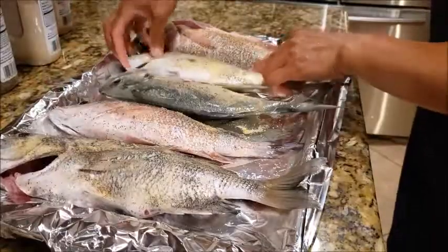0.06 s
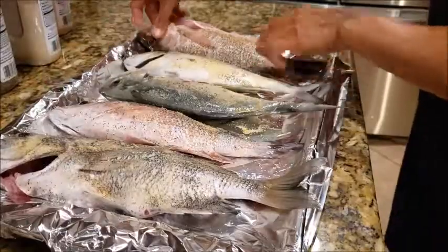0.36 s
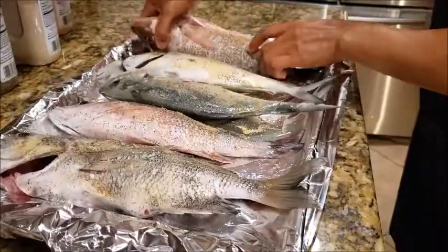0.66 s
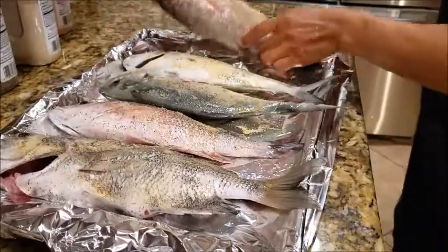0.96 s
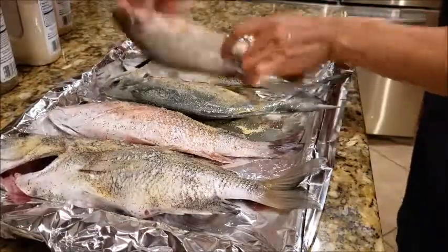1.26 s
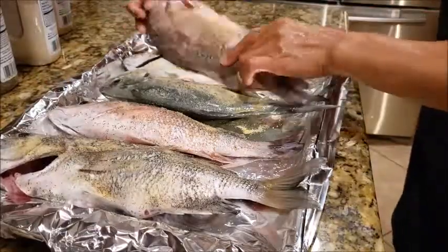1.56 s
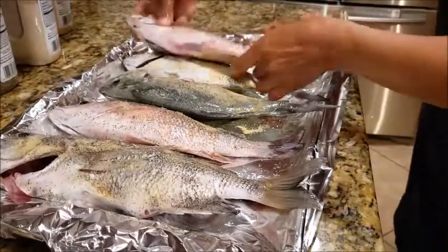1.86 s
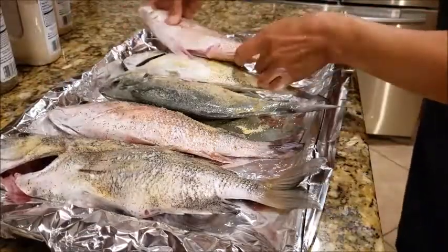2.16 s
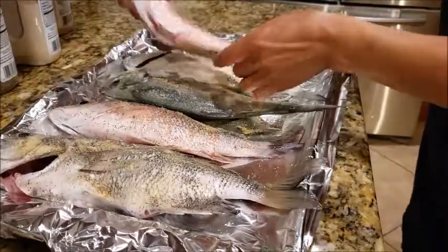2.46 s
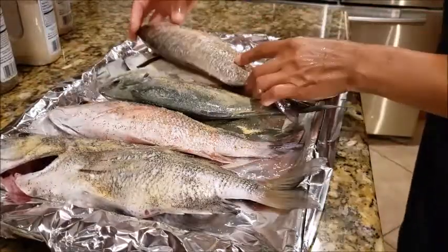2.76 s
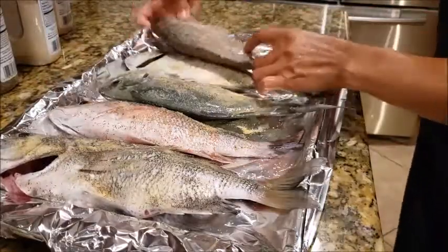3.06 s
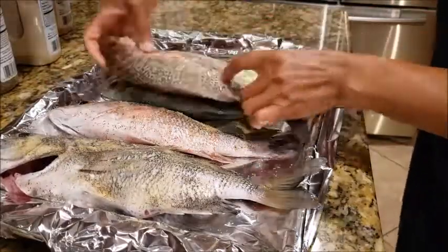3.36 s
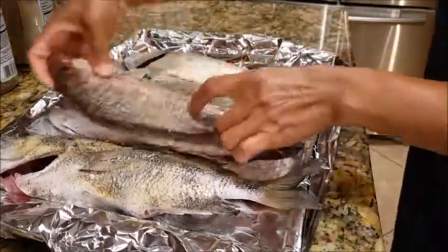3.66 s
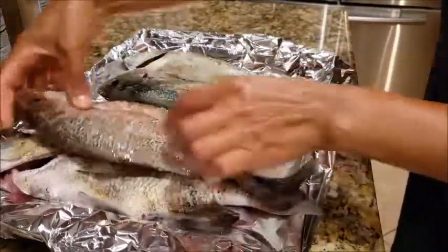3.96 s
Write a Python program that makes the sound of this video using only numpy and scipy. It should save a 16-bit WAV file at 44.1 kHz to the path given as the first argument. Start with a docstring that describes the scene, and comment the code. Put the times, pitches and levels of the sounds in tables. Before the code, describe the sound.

Foil crackles under whole fish being moved, with soft slaps, low thuds and a steady hum.

```python
"""Foil lining a tray snaps and crinkles as whole wet fish are lifted and laid down on it.
Single creases snap over, and crumpling sets off dense runs of tiny cracks. The fish land with soft
slaps that ring the damped metal, and their weight rocks the tray in low thuds. Foil and slaps ring
briefly in a small, hard kitchen, while an appliance's motor and fan hum steadily behind."""
import sys
import numpy as np
from scipy import signal
from scipy.fft import rfft, irfft, next_fast_len
from scipy.io import wavfile
from scipy.ndimage import uniform_filter1d

SR = 44100
rng = np.random.default_rng(int(sys.argv[2]) if len(sys.argv) > 2 else 0)


def generate_wav(sig):
    """Save sig (samples, or channels by samples) to the path in sys.argv[1] as 16-bit PCM at SR."""
    pcm = np.round(np.clip(np.atleast_2d(sig).T, -1, 1) * 32767).astype(np.int16)
    wavfile.write(sys.argv[1], SR, pcm)


N = 176400
T = np.arange(N) / SR
SIDES = np.array([[1], [-1]])  # left, right
MOTOR_HZ = 150


def amp(db):
    """Decibels to gain."""
    return 10 ** (np.asarray(db) / 20)


def rms(x):
    """Average level of a signal."""
    return np.sqrt(np.mean(x ** 2) + 1e-20)


def unit(x):
    """Scale to rms 1."""
    return x / rms(x)


def at_hz(table, hz, column=1):
    """Read a column of a table on a log-frequency axis."""
    table = np.array(table)
    return np.interp(np.log(hz + 1e-3), np.log(table[:, 0]), table[:, column])


def pan(db):
    """Left and right gains for a left-right level difference."""
    return amp(SIDES * db / 2)


def drift(rate_hz):
    """Slow random modulation, rms 1."""
    hz = np.fft.rfftfreq(N, 1 / SR)
    return unit(irfft(rfft(rng.standard_normal(N)) / (1 + (hz / rate_hz) ** 2), N))


def add(out, start_s, x):
    """Mix a sound in at a time."""
    i = max(int(start_s * SR), 0)
    out[..., i:i + x.shape[-1]] += x[..., :N - i]


def even_burst(envelope):
    """Noise under an envelope, its spectrum evened out so that it has no pitch; energy 1."""
    x = rng.standard_normal(envelope.shape) * envelope
    for _ in range(4):  # flatten the spectrum, then restore the envelope
        spectrum = rfft(x)
        x = irfft(spectrum / (np.abs(spectrum) + 1e-12), envelope.shape[-1])
        x = x * envelope / np.sqrt(np.abs(uniform_filter1d(x ** 2, size=64)) + 1e-14)
    return x / np.sqrt(np.sum(x ** 2, axis=-1, keepdims=True))


def place(x, treble_db, shelf_hz=10600, scatter_db=-2.5, scatter_decay_s=0.0049):
    """Give a burst its treble, its spot on the tray and counter scatter: rows left, right, room send."""
    t = T[:SR // 30]
    size = next_fast_len(len(x) + len(t))
    hz = np.fft.rfftfreq(size, 1 / SR)
    shelf = amp(treble_db * hz ** 8 / (hz ** 8 + shelf_hz ** 8))
    spectrum = rfft(np.pad(x, (20, 0)), size) * shelf
    left_lead_s = rng.normal(-0.00012, 0.00012)
    direct = np.exp(1j * np.pi * hz * left_lead_s * SIDES) * pan(db=1)
    scatter = even_burst(np.tile(np.exp(-t / scatter_decay_s), (2, 1)))
    stereo = direct + amp(scatter_db) * rfft(scatter, size)
    return irfft(spectrum * np.vstack([stereo, np.ones(len(hz))]), size)


def foil_crinkles(cracks_per_s=2600, spread_db=3, attack_share=0.1, gain_db=0.5):
    """Foil crumples under a fish or a hand: a quick swell of tiny cracks of uneven size."""
    # crumples of the foil: t/s, length/s, relative level/dB, treble/dB
    crumples = [(0.0, 0.018, -39.5, 0), (0.084, 0.038, -49, -12), (0.15, 0.088, -48.5, 4),
                (0.197, 0.041, -43.5, -3), (0.4, 0.065, -42.5, -1.5), (0.47, 0.078, -49, -2),
                (0.544, 0.042, -42.5, 2.5), (0.597, 0.15, -45, -7), (0.72, 0.03, -39.5, -23),
                (0.749, 0.062, -33.5, -5.5), (1.318, 0.04, -38, -1.5), (1.511, .13, -59, -1),
                (1.884, 0.046, -49, 0), (2.114, 0.063, -44.5, -2), (2.273, 0.032, -48, -16),
                (2.317, 0.29, -64, -12), (2.682, 0.06, -40, -9), (2.692, 0.042, -32, -0.5),
                (2.755, 0.024, -35.5, 3.5), (2.955, 0.08, -49.5, -4), (3.019, 0.056, -45, -8),
                (3.142, .025, -44.5, -24), (3.339, 0.037, -47, 0), (3.435, 0.077, -55, -4),
                (3.586, 0.032, -49, 2), (3.61, 0.15, -54.5, -4), (3.801, 0.018, -31, -1),
                (3.84, 0.071, -41.5, -25), (3.886, 0.044, -38.5, -10)]
    out = np.zeros((3, N))
    for start, length, db, treble_db in crumples:
        chance, size, sign = rng.random((3, SR // 4))
        crack_db = spread_db * np.minimum(-np.log(size), 3.5)
        cracks = (chance < cracks_per_s / SR) * amp(crack_db) * np.sign(sign - 0.5)
        cracks = cracks[:int(length * SR)]
        progress = np.linspace(0, 1, len(cracks))
        press = np.interp(progress, [0, attack_share, 1], [0.1, 1, 0.1]) ** 0.5
        add(out, start, place(amp(db + gain_db) * unit(cracks * press), treble_db))
    return out


def tone(hz, db, pan_db, waver_rad, waver_db=0.92):
    """A stereo sine that wavers a little in level and phase."""
    phase = 2 * np.pi * (hz * T + rng.random()) + waver_rad * drift(rate_hz=2.7)
    width_rad = SIDES * 0.092 * min(hz / MOTOR_HZ, 6)
    level = amp(db + waver_db * drift(rate_hz=7.1))
    return np.sqrt(2) * level * pan(pan_db) * np.sin(phase + width_rad)


def appliance_hum():
    """The motor's harmonics, the higher ones less steady, and faint wavering tones beside them."""
    # motor harmonics: multiple, level/dB, left-right/dB
    harmonics = [(1, -38.5, 0.5), (3, -56.5, -4.5), (4, -60.5, -3.5), (6, -62, -1.5), (8, -67.5, -6),
                 (9, -70.5, -7), (10, -70, 12.5), (14, -73.5, -11), (16, -75, -16), (21, -73, 6)]
    # tones off the harmonic series: f/Hz, level/dB, left-right/dB
    drones = [(50.5, -65, 3), (95, -57, -2.5), (115.3, -61, 3), (189.3, -56, 0), (218.2, -62.5, -7),
              (239.7, -61, -1), (287, -69.5, -2), (2821, -75.5, 1)]
    motor = sum(tone(k * MOTOR_HZ, db, pan_db, waver_rad=0.098 * k ** 0.8)
                for k, db, pan_db in harmonics)
    return motor + sum(tone(hz, db, pan_db, waver_rad=0.46) for hz, db, pan_db in drones)


def fan_air(level_db=-48):
    """A smooth rush of air from the fan, narrow in the bass and wide in the treble."""
    # spectrum of the moving air: f/Hz, relative density/dB, left-right correlation, left-right/dB
    rush = [(19.8, -10, .85, 10), (42, -24, .85, 0), (75, 0, 1, -1), (102, 1.5, 0.74, -5), (168, 1, .9, 9),
            (250, -7.5, 0.79, 2), (390, -8.5, 0.72, -4.5), (810, -12.5, 0.3, 3), (1330, -18, 0.1, -4),
            (2100, -21, 0.067, 1), (3150, -20.5, 0.033, -3), (4600, -26.5, 0.033, -3),
            (9800, -29, 0.042, 0), (16000, -30, .1, -1)]
    hz = np.fft.rfftfreq(N, 1 / SR)
    mid, side = rfft(rng.standard_normal((2, N)))
    alike = at_hz(rush, hz, column=2)
    noise = np.sqrt(1 + alike) * mid + SIDES * np.sqrt(1 - alike) * side
    colour = amp(at_hz(rush, hz)) * pan(at_hz(rush, hz, column=3))
    return amp(level_db) * unit(irfft(colour * noise, N))


def foil_snaps(rise_s=0.00052, decay_s=0.0021, gain_db=6):
    """Single creases snap over, each with one sharp tick of noise."""
    # snapping creases: t/s, relative level/dB, treble/dB
    creases = [(0.077, -42.5, 5), (0.16, -40, 4), (0.175, -51, -2), (0.203, -32, 2), (0.228, -33, -4),
               (0.404, -40.5, 9), (0.415, -40, 5), (0.526, -39, 2), (0.545, -40, 0), (0.555, -29, -18),
               (0.605, -33.5, -21), (0.68, -31.5, -4.5), (0.729, -31.5, -0.5), (0.765, -30.5, 2),
               (0.866, -32.5, -4), (0.886, -36, -1), (0.9993, -34.5, -1.5), (1.309, -43, 4),
               (1.567, -48.5, 3), (1.899, -40, 3), (2.123, -35, -2), (2.211, -40, 2), (2.760, -28, 3.5),
               (2.953, -43, -4), (3.022, -41, 2), (3.179, -50, 3), (3.336, -46.5, 6), (3.361, -34, 0.5),
               (3.433, -43.5, -14), (3.452, -41.5, -6), (3.48, -49, 2), (3.631, -48, 6), (3.8091, -28, 11),
               (3.8149, -20, 2.5), (3.818, -28, -1), (3.834, -46, -11), (3.865, -49, 3)]
    out, t = np.zeros((3, N)), T[:SR // 50]
    rise, fall = 1 - np.exp(-t / rise_s), np.exp(-t / decay_s)
    for start, db, treble_db in creases:
        snap = unit(even_burst(rise * fall)) * rms(fall)
        add(out, start, place(amp(db + gain_db) * snap, treble_db))
    return out


def foil():
    """Snaps and crinkles take the thin, bright colour of the sheet: rows left, right, room send."""
    # colour of the foil: f/Hz, gain/dB
    colour = [(200, -63), (500, -11), (950, -1.5), (1700, 0.5), (2900, 2), (5500, 0.5), (9500, 0.5),
              (12500, -1.5), (16000, 1)]
    crackle = foil_snaps() + foil_crinkles()
    hz = np.fft.rfftfreq(2 * N, 1 / SR)
    return irfft(rfft(crackle, 2 * N) * amp(at_hz(colour, hz)))[:, :N]


def fish_thuds(rise_s=0.012):
    """The soft weight of a fish rocks the tray for a few cycles."""
    # weight landing on the tray: t/s, level/dB, f/Hz
    thuds = [(2.691, -34.5, 79), (2.757, -45, 95), (3.335, -42, 82), (3.595, -35.5, 88.5)]
    out, t = np.zeros(N), T[:SR // 2]
    swell = t / rise_s * np.exp(1 - t / rise_s)
    for start, db, hz in thuds:
        add(out, start, amp(db) * swell * np.sin(2 * np.pi * hz * t))
    return out


def fish_slaps(decay_s=0.0046, band_ratio=1.4):
    """Wet skin meets the tray: a brief, dull burst and the damped ring of the metal."""
    # wet contacts: t/s, relative level/dB, band centre f/Hz, relative ring level/dB
    slaps = [(2.695, -30.5, 228, -60), (2.710, -27.5, 960, -39), (2.758, -33.5, 950, -49),
             (3.8145, -24.5, 1840, -68)]
    # modes of the loaded tray: f/Hz, relative level/dB, t60/s
    tray_modes = [(281, 2, 0.066), (702, 8, 0.07), (983, 1, .06), (1118, 7, .09), (1290, -15, 0.051)]
    out, t = np.zeros(N), T[:SR // 5]
    fall = np.exp(-t / decay_s)
    for start, db, hz, ring_db in slaps:
        band = signal.butter(3, [hz / band_ratio, hz * band_ratio], "band", fs=SR, output="sos")
        smack = unit(signal.sosfilt(band, even_burst(fall))) * rms(fall)
        add(out, start, amp(db) * smack)
        for mode_hz, mode_db, t60 in tray_modes:
            ring = np.sin(2 * np.pi * mode_hz * t) * np.exp(-np.log(1000) * t / t60)
            add(out, start, amp(ring_db + mode_db) * ring)
    return out


def kitchen(send, onset_s=0.0041):
    """The small, hard room answers with a diffuse tail that dies band by band."""
    # decay of the room: f/Hz, t60/s
    decays = [(300, 0.25), (1500, 0.33), (4000, 0.28), (9000, 0.27), (16000, 0.23)]
    centres, t60 = np.transpose(decays)
    rates = np.log(1000) / t60
    t = T[:SR // 2]
    hz = np.fft.rfftfreq(len(t), 1 / SR)
    envelope = np.exp(-rates.mean() * t) * (1 - np.exp(-t / onset_s))
    spectrum = rfft(even_burst(np.tile(envelope, (2, 1))))
    tail = np.zeros((2, len(t)))
    for one_band, rate in zip(np.eye(len(centres)), rates):
        band = np.interp(np.log(hz + 1), np.log(centres), one_band)
        tail += irfft(spectrum * band, len(t)) * np.exp((rates.mean() - rate) * t)
    return signal.fftconvolve(send[None], tail, axes=1)[:, :N]


def scene(tray_db=-4.5, slap_send_db=-6.5):
    """Foil and drier slaps in the room, with dry thuds, over a bed of hum and air."""
    crackle, slaps = foil(), fish_slaps()
    foil_stereo, foil_send = crackle[:2], crackle[2]
    room = kitchen(foil_send + amp(slap_send_db) * slaps) * pan(db=-1)
    return amp(tray_db) * (foil_stereo + slaps + room) + fish_thuds() + appliance_hum() + fan_air()


def record(dry, cutoff_hz=15750):
    """The microphone ports ring in the top octave, the left one more; the very top is cut."""
    # colour of the two ports: f/Hz, left gain/dB, right gain/dB
    ports = [(1160, 0, -0.5), (2370, -4.5, 0), (4900, 0, -0.5), (7220, -3, 2), (9000, -2.5, -2),
             (11200, 2.5, -1), (13350, 5, 3.5), (14100, 8.5, 5.5), (16000, 11, -22)]
    hz = np.fft.rfftfreq(2 * N, 1 / SR)
    colour = amp([at_hz(ports, hz, column=1), at_hz(ports, hz, column=2)])
    coloured = irfft(rfft(dry, 2 * N) * colour)[:, :N]
    high_cut = signal.ellip(10, 0.3, 80, cutoff_hz, fs=SR, output="sos")
    return signal.sosfilt(high_cut, coloured)


dry = scene()
out = record(dry)
generate_wav(out)
```